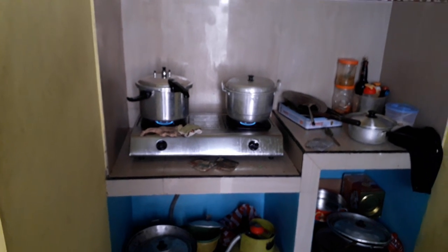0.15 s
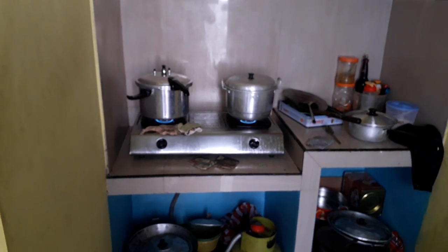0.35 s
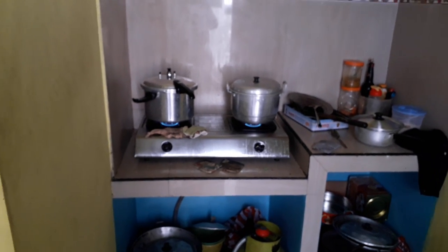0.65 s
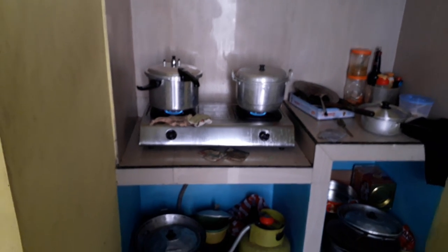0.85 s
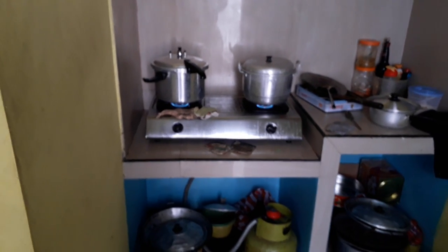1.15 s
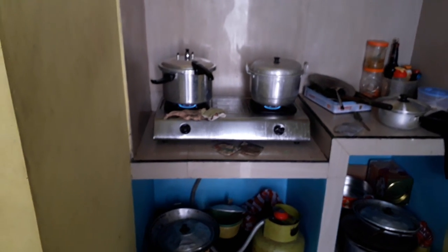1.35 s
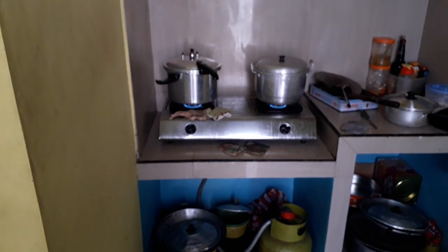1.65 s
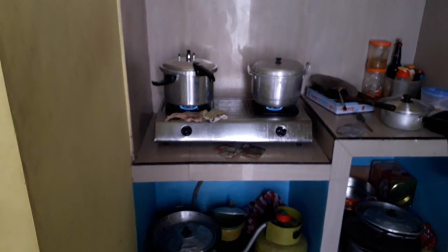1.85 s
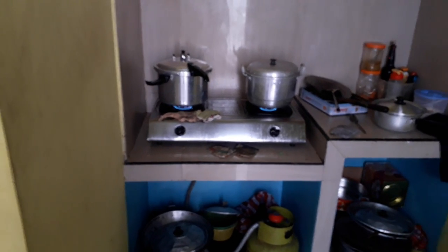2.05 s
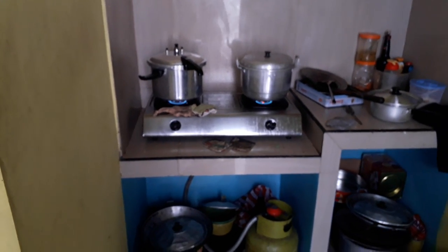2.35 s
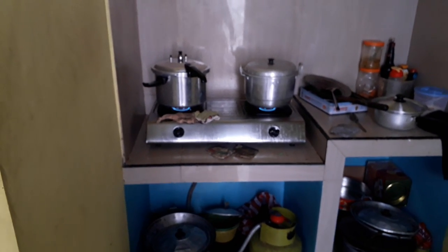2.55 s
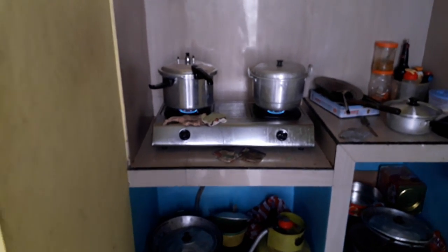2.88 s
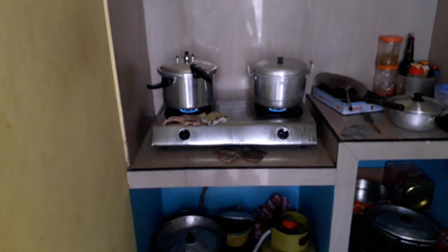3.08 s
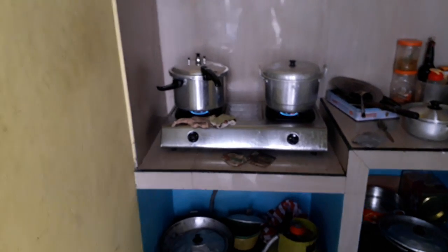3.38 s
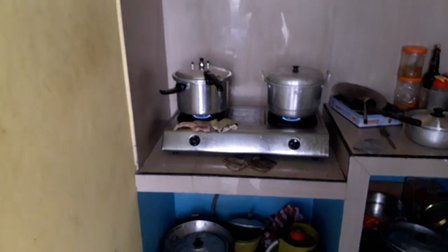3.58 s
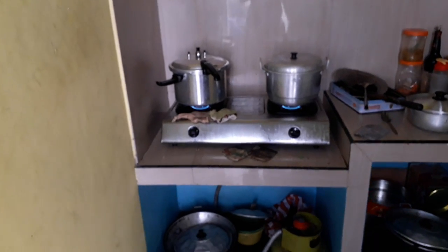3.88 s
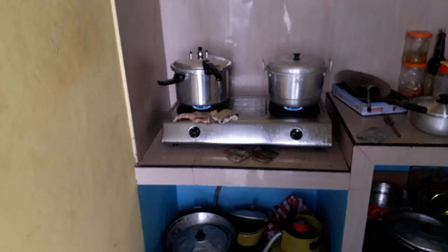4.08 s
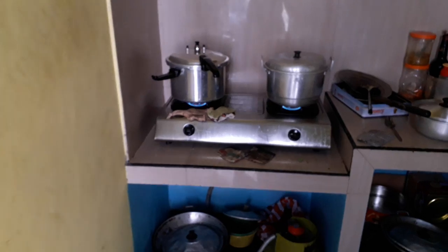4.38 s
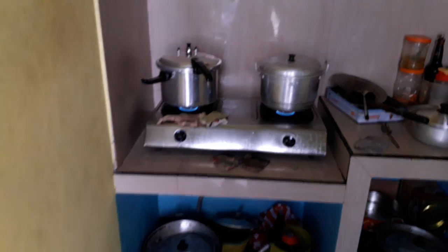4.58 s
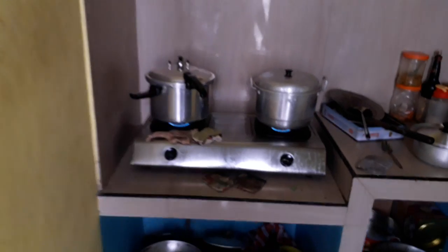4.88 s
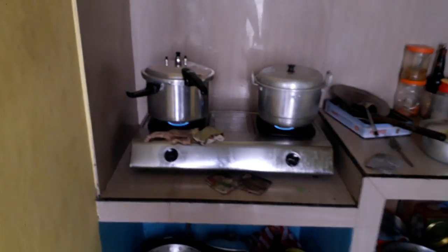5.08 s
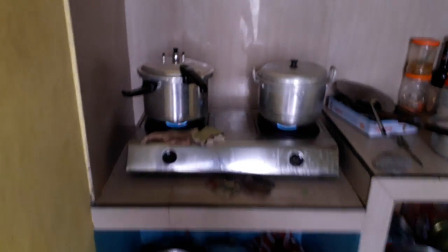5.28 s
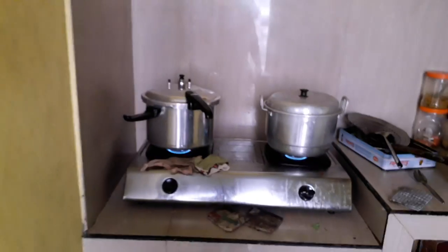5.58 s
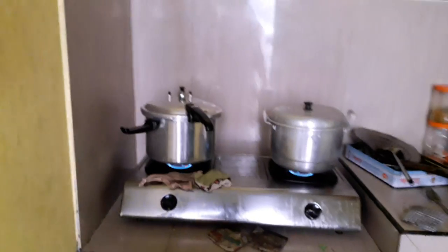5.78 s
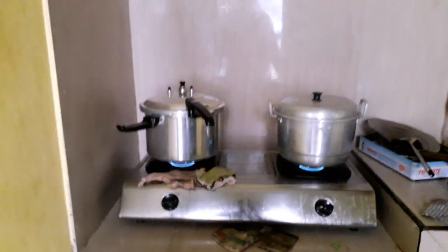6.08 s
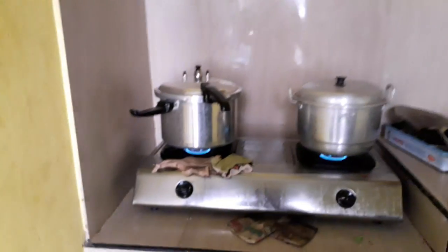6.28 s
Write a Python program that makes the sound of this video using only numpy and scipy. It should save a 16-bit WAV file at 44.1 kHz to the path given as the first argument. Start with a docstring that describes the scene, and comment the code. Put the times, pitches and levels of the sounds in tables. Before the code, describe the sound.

A pressure cooker on a gas stove lets out a steady, high hiss of steam with a slight sputter. Dull footsteps and knocks sound through the house, and a few small ticks come and go. Before the middle, one hard knock briefly rings something metal. More thumps follow, and the hiss grows slightly louder as a hand-held microphone moves closer across the kitchen, over a low rumble.

```python
"""Steam hisses from a pressure cooker's vent on a gas stove: a turbulent jet, heard with short wall
echoes at the two ports of a hand-held phone coming closer across a tiled kitchen.
Steps and knocks in the house fill the room with short dull tails and wake its lowest mode; the
hardest knock also rings something metal. Behind them: small ticks and a low household rumble."""
import sys
import numpy as np
from scipy import signal
from scipy.fft import rfft, irfft, next_fast_len
from scipy.io import wavfile
from scipy.ndimage import uniform_filter1d

SR = 44100
rng = np.random.default_rng(int(sys.argv[2]) if len(sys.argv) > 2 else 0)


def digitize_waveform(pressure):
    """Quantize a signal to 16-bit integers and store it at the path in sys.argv[1].

    Rows of a 2-D input are taken as channels; values are limited to [-1, 1].
    """
    field = np.atleast_2d(pressure).T
    bounded = np.clip(field, -1, 1)
    quanta = np.round(bounded * 32767).astype(np.int16)
    wavfile.write(sys.argv[1], SR, quanta)


N = 283563

# Hiss over time, bands taken about their means: time_s, top_level_db, band_8450hz_db, band_5500hz_db
STEAM_LEVELS = [(0.1, -41.5, 4, 4.5), (0.34, -40.5, 4.8, 2.5), (0.5, -41, 4.8, 1), (1.56, -40.5, 5.7, 0.5),
                (1.7, -40.5, 8, 2.5), (1.89, -40.5, 6.6, 2.5), (2.14, -40, 4.4, 1), (2.28, -41.5, 5.4, 4),
                (2.45, -40, 3, 2), (2.55, -42, 6, 4), (4.03, -41, 4.6, 1.5), (4.26, -42, 7.5, 2.5),
                (4.66, -42, 5.4, 4), (4.71, -41.5, 6.1, 2.5), (4.87, -41, 7.1, 3.5), (5.36, -39, 7.2, 1),
                (5.91, -38.5, 2, 2), (6.35, -39, 4.3, 3)]
# Jet colour through vent, room and phone body: freq_hz, gain_db
JET_SPECTRUM = [(1850, -6), (2250, -15.5), (3000, -16.5), (3750, -11.5), (4650, -10.5), (5500, -2),
                (6400, -7.5), (7300, -2.5), (7950, -4.5), (8400, 2), (9000, -4.5), (9500, -15),
                (10400, -8.5), (11200, -13.5)]
# Port imbalance, the left rings more near 8 kHz: freq_hz, left_minus_right_db
PORT_BALANCE = [(2000, 0.5), (5500, -1), (6600, 0), (7400, 3), (8400, 6.5), (9000, 7.5), (9500, -8),
                (10450, 1), (11500, -0.5), (15000, -2)]
# Diffuse field between the ports: freq_hz, correlation
PORT_CORRELATION = [(60, 0.98), (130, .97), (290, 0.92), (640, 0.55), (1400, 0.11), (2100, 0.11),
                    (3100, 0.38), (6000, 0.034)]
# Steps and knocks: start_s, body_db, body_hz, spread_oct, tail_t60_s, boom_db, clack_db, clack_hz
BLOWS = [(0.005, -29, 170, 0.78, 0.27, -42, -53, 1030), (0.263, -29, 462, 0.14, 0.68, -56, -31, 1390),
         (0.333, -28, 386, 0.32, 0.43, -38, -30.5, 1390), (0.69, -34.5, 140, 0.59, 1.14, -38, -49, 1010),
         (1.15, -28.5, 184, 0.54, 0.42, -45, -52, 1000), (1.62, -28, 190, 0.76, 0.52, -40.5, -45, 1010),
         (1.771, -29, 171, 0.37, 0.33, -45, -42, 1010), (2.039, -31.5, 159, 0.21, 0.95, -32, -55, 990),
         (2.4951, -11.5, 263, 0.64, 0.53, -32.5, -21.5, 1080),
         (2.959, -35.5, 200, 0.41, 0.89, -37, -50, 1000), (3.028, -33.5, 138, 0.37, 0.76, -35, -60, 990),
         (3.314, -21, 281, 0.35, 0.55, -38.5, -38, 905), (3.918, -21.5, 190, 0.63, 0.37, -36, -33, 875),
         (4.257, -21, 268, 0.57, 0.57, -32.5, -31.5, 1120), (4.516, -32, 212, 0.15, 0.27, -58, -55, 1000),
         (5.08, -25, 201, 0.66, 0.67, -34, -34.5, 805), (5.215, -24.5, 177, 0.77, 0.19, -59, -39, 910),
         (5.448, -24.5, 186, 0.71, 0.95, -31, -36, 895), (5.66, -22, 244, 0.56, 0.62, -56, -31, 1670),
         (5.67, -21, 455, 0.21, 0.73, -58, -33.5, 990), (5.772, -24, 240, 0.22, 0.34, -44, -33, 790),
         (5.85, -25.5, 165, 0.54, 0.58, -40.5, -57, 900), (6.351, -28, 202, 1.05, 0.31, -40.5, -41, 910)]
# Wall and cupboard modes: pitch_hz, gain_db, base_t60_s
BODY_MODES = [(136.6, -1.5, 0.93), (169.5, 4.5, 0.37), (206.3, -3, 0.53), (251.2, -1.5, 0.4),
              (294, -4, 0.53), (319.3, -4, 0.31), (379, -1, 0.46), (395, 0.5, 0.37), (448, -5.5, 0.57),
              (495, 1.5, 0.2), (690, -2, 0.33), (730, -14, 0.2)]
# Midrange modes of a blow: pitch_hz, gain_db, base_t60_s
MID_MODES = [(912, -3, .4), (1013, 0, .5), (1160, -3, .5), (1292, -4, .5), (1385, -1, .5), (1420, -2, .4)]
# Modes of the metal object: pitch_hz, gain_db, base_t60_s
METAL_MODES = [(1965, -8, .5), (2086, -4, .5), (2125, 0, .6), (2150, -3, .5), (2188, -7, .4)]
# Small ticks: start_s, level_db, pitch_hz, snap_gain_db, echo_gain_db
TICK_EVENTS = [(1.023, -32, 1200, 14, -7), (1.738, -33, 1930, 2, -22), (2.282, -28.5, 2980, 2, -16),
               (2.306, -22, 2100, -4, -20), (2.445, -33, 1270, -14, -17), (3.18, -28, 1970, -13, -18),
               (4.598, -27, 1940, -8, -17), (4.623, -27, 2010, -6, -22), (5.6, -30, 1730, -3, -22)]
# Household rumble colour: freq_hz, gain_db
RUMBLE_SPECTRUM = [(15, -49), (25, -26), (57, -11), (92, 1.5), (228, -6), (285, -5), (682, -13.5),
                   (961, -10.5), (1290, -13.5), (1500, -12), (1950, -44), (3300, -120)]

LOW_MODE_HZ = 84.3
FFT_SIZE, TIME_S = next_fast_len(N), np.arange(N) / SR


def steam():
    """Turbulent jet in overlapping bands; each flickers, differently at each port as the hand sways."""
    flow_db, *bands_db = [np.interp(TIME_S, np.transpose(STEAM_LEVELS)[0], column)
                          for column in np.transpose(STEAM_LEVELS)[1:]]
    whistle_db, mid_db = (db - db.mean() for db in bands_db)
    field, hz = diffuse(FFT_SIZE)
    echo_share = 0.78 * bump(hz, 3500, 1.96)  # the top is too scattered to keep a pattern
    field = np.sqrt(1 - echo_share) * field + np.sqrt(echo_share) * wall_echoes()
    port_db = over_hz(PORT_BALANCE, hz) / 2
    low_cut = np.clip(hz / 1850, .3, 1) ** 7.03
    field *= undb(over_hz(JET_SPECTRUM, hz) + np.array([port_db, -port_db])) * low_cut
    centres_hz = np.array([1850, 3800, 5500, 7300, 8450, 10400, 13500])
    roar_db = np.interp(TIME_S, [2.9, 3.5], [0, 1.5])
    boosts_db = [roar_db, mid_db / 2, mid_db, whistle_db / 2, whistle_db, 0, 0]
    sputter, out = waver(12), 0
    sputter -= uniform_filter1d(sputter, SR // 4)  # quick sputters only
    for centre_hz, boost_db in zip(centres_hz, boosts_db):
        band = np.interp(np.log(hz + 1), np.log(centres_hz), centres_hz == centre_hz)
        sway_db = 0.58 * np.array([waver(5.4), waver(8.8)])
        flicker_db = 0.75 * sputter * (centre_hz < 10000) + sway_db
        out += undb(boost_db + flicker_db) * to_wave(field * band)
    top = irfft(field.mean(axis=0) * (hz > 10000) * (hz < 15500), FFT_SIZE)  # flow_db sets this band
    return undb(flow_db) * out / np.sqrt(np.mean(top ** 2))


def wall_echoes(positions=16, t60_s=0.16):
    """Spectrum of a white jet after many short echoes; the pattern shifts as the phone moves."""
    jet, t = rfft(rng.standard_normal(FFT_SIZE)), np.arange(SR // 4) / SR
    position, out = np.arange(FFT_SIZE) / N * (positions - 1), 0
    for k in range(positions):
        paths = rng.standard_normal((2, len(t))) * decay(t, t60_s)
        crossfade = np.sqrt(np.clip(1 - abs(position - k), 0, 1))
        out += crossfade * unit(irfft(jet * rfft(paths, FFT_SIZE), FFT_SIZE))
    return rfft(out)


def thumps(rise_cycles=2.4, boom_peak_s=0.064):
    """Blows arrive mostly by way of the walls: modes, a diffuse tail and a late low boom."""
    out, size = np.zeros((2, N + SR)), SR * 2 // 3
    t = np.arange(size) / SR
    body_modes_hz, mid_modes_hz = np.array(BODY_MODES)[:, 0], np.array(MID_MODES)[:, 0]
    for start_s, body_db, body_hz, spread_oct, t60_s, boom_db, clack_db, clack_hz in BLOWS:
        field, hz = diffuse(size)
        fade, stretch = decay(t, t60_s), t60_s / .55
        body = 0.73 * ringing(BODY_MODES, bump(body_modes_hz, body_hz, spread_oct), t, stretch)
        body += 0.31 * fade * noise_band(field, hz, body_hz, 1.47 * spread_oct)
        clack = 0.48 * ringing(MID_MODES, bump(mid_modes_hz, clack_hz, 0.41 * spread_oct), t, stretch)
        clack += 0.5 * fade * noise_band(field * (hz < 2400), hz, clack_hz, 1.1 * spread_oct)
        swell = (t / boom_peak_s * np.exp(1 - t / boom_peak_s)) ** 2
        boom = swell * np.sin(2 * np.pi * (LOW_MODE_HZ * t + rng.random()))
        attack = 1 - np.exp(-t * body_hz / rise_cycles)  # lower, softer blows build more slowly
        blow = attack * (undb(body_db) * body + undb(clack_db) * clack)
        add_at(out, start_s, blow + undb(boom_db) * boom)
    return out[:, :N]


def metal_ring(start_s=2.4951, gain_db=-19, stretch=0.93):
    """The hardest knock rings metal: a sharp crack, then modes near 2 kHz and a diffuse tail."""
    out, size = np.zeros((2, N)), SR * 2 // 3
    t = np.arange(size) / SR
    field, hz = diffuse(size)
    ring = 0.53 * ringing(METAL_MODES, 1, t, stretch)
    tail = 0.46 * decay(t, 0.6 * stretch) * noise_band(field, hz, 2065, 0.1)
    port_phase_rad = np.array([[0], [2.4]])  # the direct crack reaches the ports nearly opposed
    crack = 2.4 * np.exp(-t / 0.0062) * np.sin(2 * np.pi * METAL_MODES[1][0] * t + port_phase_rad)
    attack = 1 - np.exp(-t / 0.00049)
    add_at(out, start_s, undb(gain_db) * (ring + tail + crack) * attack)
    return out


def ticks():
    """Short rings, each with a broad snap and a faint wall echo."""
    out, size = np.zeros((2, N + SR)), SR // 8
    t = np.arange(size) / SR
    for start_s, level_db, pitch_hz, snap_db, echo_db in TICK_EVENTS:
        field, hz = diffuse(size)
        grain = noise_band(field, hz, pitch_hz, 0.16)
        snap = undb(snap_db) * noise_band(field, hz, 5300, 0.56)
        ring = np.sin(2 * np.pi * (pitch_hz * t + rng.random((2, 1))))
        envelope = (1 - np.exp(-t / .0007)) * np.exp(-t / .0025)
        echo = undb(echo_db) * grain * np.exp(-t / 0.038)
        add_at(out, start_s, undb(level_db) * (envelope * (ring + .5 * grain + snap) + echo))
    return out[:, :N]


def house_rumble(level_db=-44.5):
    """Household rumble; wavers most in the bass and keeps the lowest room mode humming."""
    field, hz = diffuse(FFT_SIZE)
    low_cut = np.clip(hz / 75, .6, 1) ** 2.5
    hum = undb(2.0) * bump(hz, LOW_MODE_HZ, 0.045)
    field *= undb(over_hz(RUMBLE_SPECTRUM, hz)) * (hz < 1500) * low_cut + hum
    upper_share = np.clip(np.log2((hz + 1) / 100) / 2.5, 0, 1)
    bass = undb(1.5 * waver(14)) * to_wave(field * (1 - upper_share))
    upper = undb(.8 * waver(9.9)) * to_wave(field * upper_share)
    return undb(level_db) * unit(bass + upper)


def deep_swell(base_db=-63.5, swell_db=9, waver_db=5.5, centre_hz=58.2):
    """Narrow wavering noise below the lowest room mode; swells once, holds and falls."""
    field, hz = diffuse(FFT_SIZE)
    swell = np.interp(TIME_S, [0.9, 1.25, 2.02, 2.32], [0, 1, 1, 0])
    level_db = base_db + swell_db * swell + waver_db * (1 - swell) * waver(7.3)
    return undb(level_db) * unit(to_wave(field * bump(hz, centre_hz, 0.17)))


def ringing(modes, weight, t, stretch):
    """Damped modes, new in phase and strength at each blow; the ports differ more in the treble."""
    hz, gain_db, t60_s = np.transpose(modes)
    strength, phase_cycles, direction = rng.standard_normal((len(hz), 3)).T
    port_rad = np.arccos(over_hz(PORT_CORRELATION, hz)) * np.sign(direction) / 2
    gains = weight * undb(gain_db + 0.91 * strength)
    phase_rad = 2 * np.pi * (np.outer(hz, t) + phase_cycles[:, None])
    fade = decay(t, stretch * t60_s[:, None])
    out = np.array([gains @ (fade * np.sin(phase_rad + side * port_rad[:, None])) for side in (1, -1)])
    return out / np.sqrt(np.sum(gains ** 2))


def diffuse(size):
    """Two-port spectrum of noise arriving from all sides, and its frequencies."""
    hz = np.fft.rfftfreq(size, 1 / SR)
    correlation = over_hz(PORT_CORRELATION, hz)
    mid, side = rfft(rng.standard_normal((2, size)))
    mid *= np.sqrt((1 + correlation) / 2)
    side *= np.sqrt((1 - correlation) / 2)
    return np.array([mid + side, mid - side]), hz


def waver(rate_hz):
    """Random steps smoothed twice; spread near 1."""
    hold = int(SR / rate_hz)
    steps = np.repeat(rng.standard_normal(N // hold + 1), hold)
    return 1.3 * uniform_filter1d(uniform_filter1d(steps, hold), hold)[:N]


def noise_band(field, hz, centre_hz, width_oct):
    return unit(irfft(field * bump(hz, centre_hz, width_oct)))


def bump(hz, centre_hz, width_oct):
    return np.exp(-.5 * (np.log2((hz + 1) / centre_hz) / width_oct) ** 2)


def over_hz(table, hz):
    knots_hz, values = np.transpose(table)
    return np.interp(np.log(hz + 1), np.log(knots_hz), values)


def to_wave(spectrum):
    return irfft(spectrum, FFT_SIZE)[:, :N]


def decay(t, t60_s):
    return np.exp(-np.log(1000) * t / t60_s)


def add_at(out, start_s, sound):
    start = int(start_s * SR)
    out[:, start:start + sound.shape[1]] += sound


def undb(db):
    return 10 ** (np.asarray(db) / 20)


def unit(x):
    return x / np.sqrt(np.mean(x ** 2))


def scene():
    return steam() + house_rumble() + deep_swell() + thumps() + metal_ring() + ticks()


def record(dry):
    """The phone cuts the top."""
    cutoff_hz = 15720
    return signal.sosfilt(signal.ellip(10, .2, 80, cutoff_hz, fs=SR, output="sos"), dry)


dry = scene()
out = record(dry)
digitize_waveform(out)
```